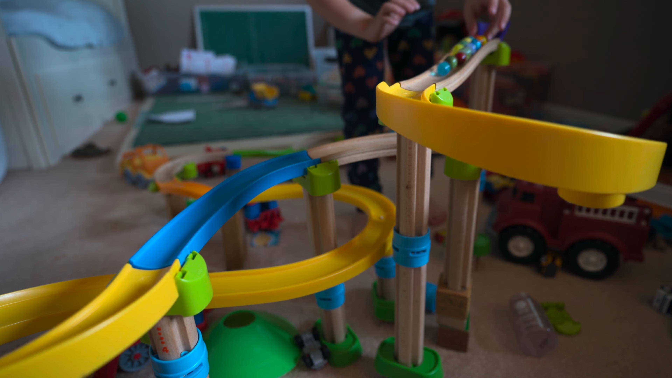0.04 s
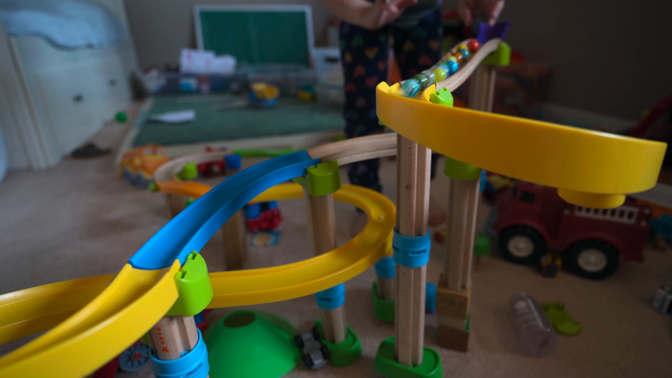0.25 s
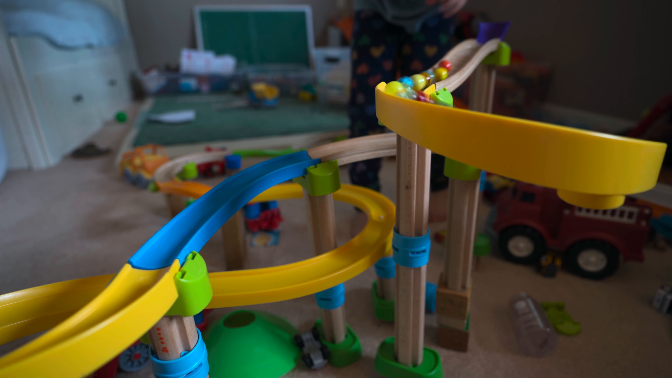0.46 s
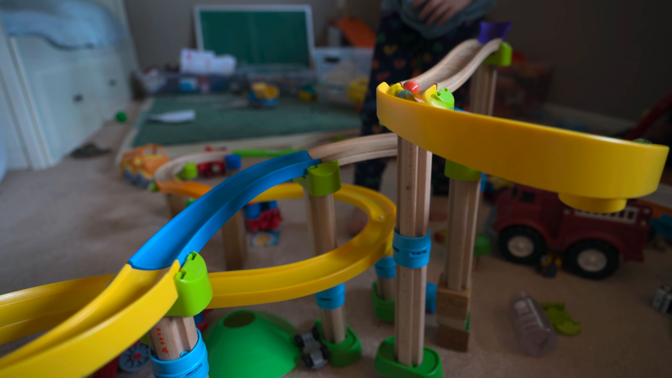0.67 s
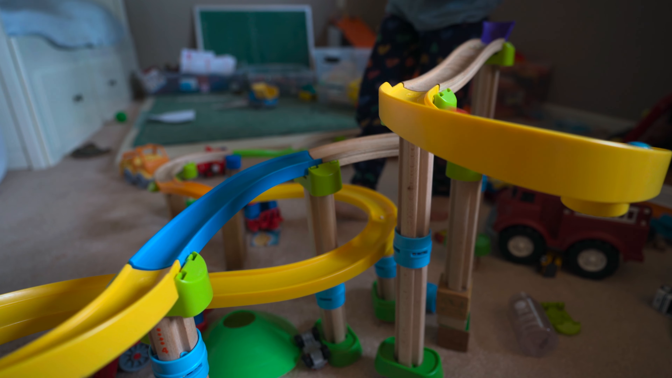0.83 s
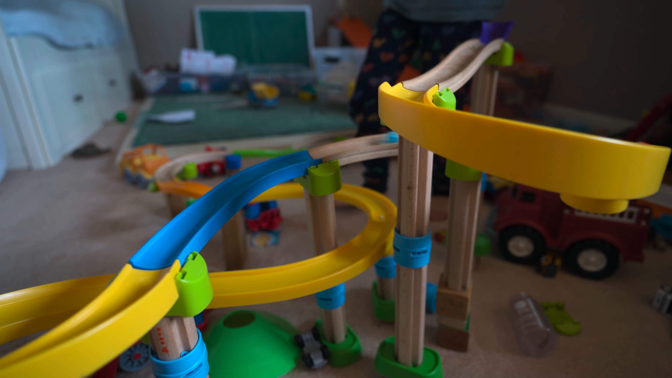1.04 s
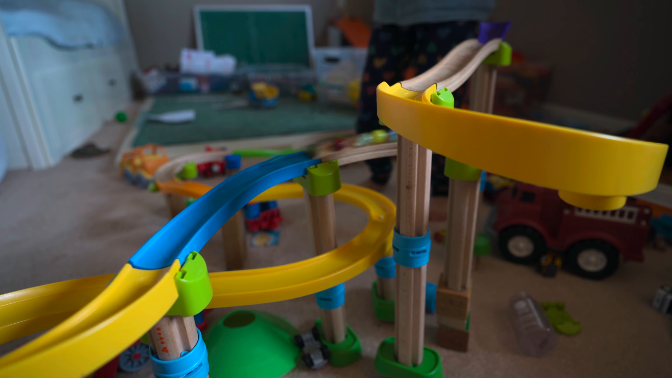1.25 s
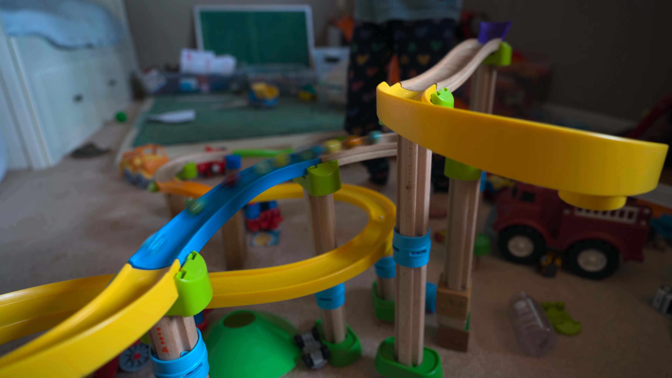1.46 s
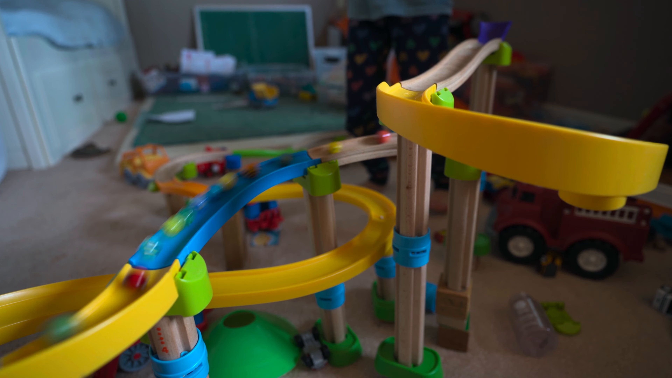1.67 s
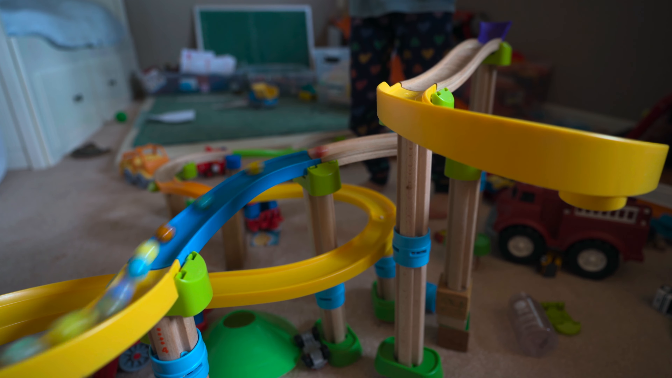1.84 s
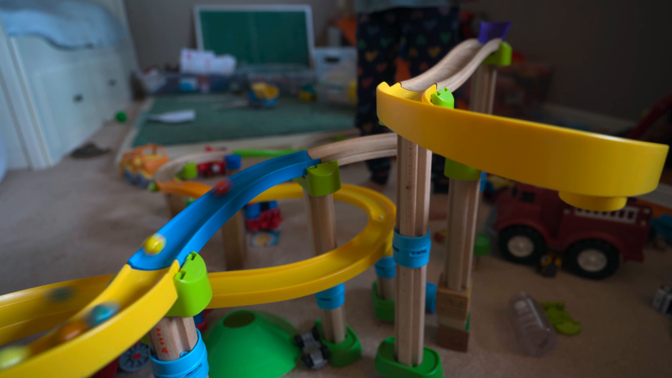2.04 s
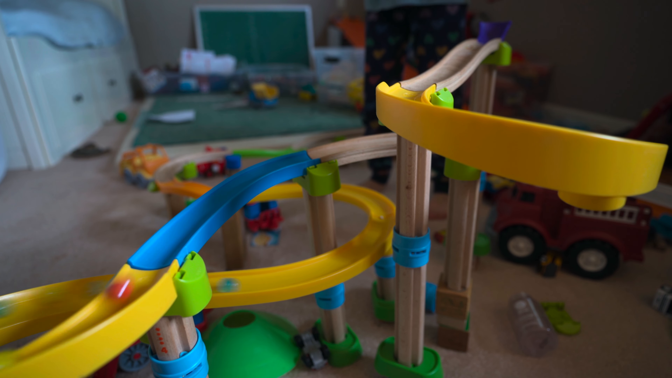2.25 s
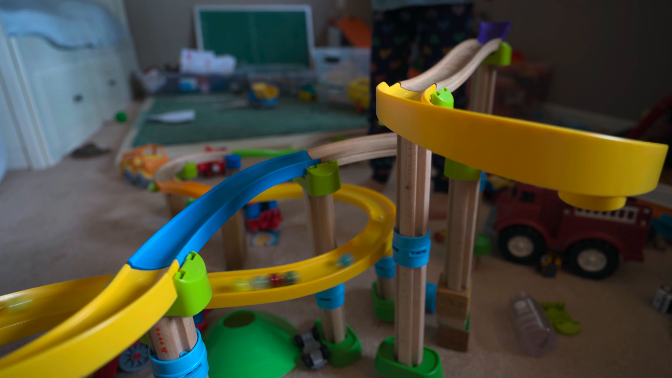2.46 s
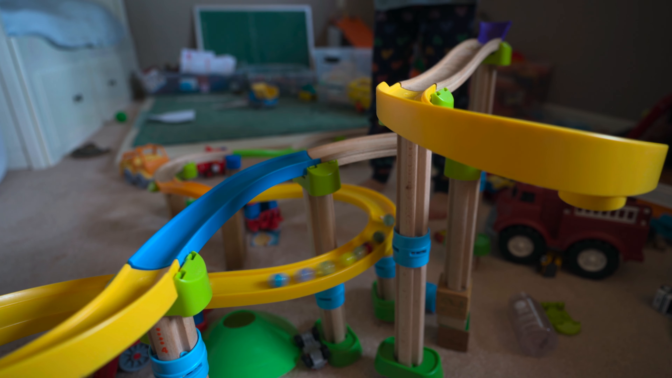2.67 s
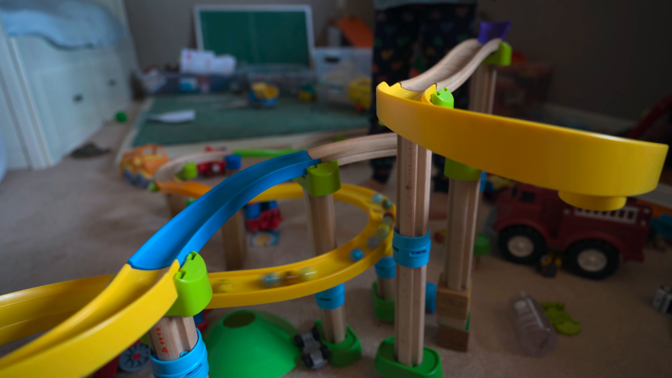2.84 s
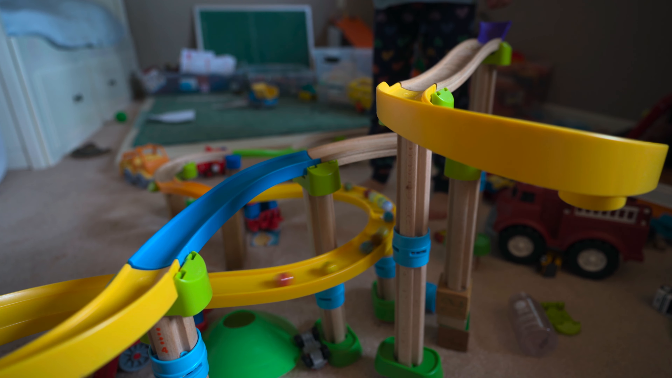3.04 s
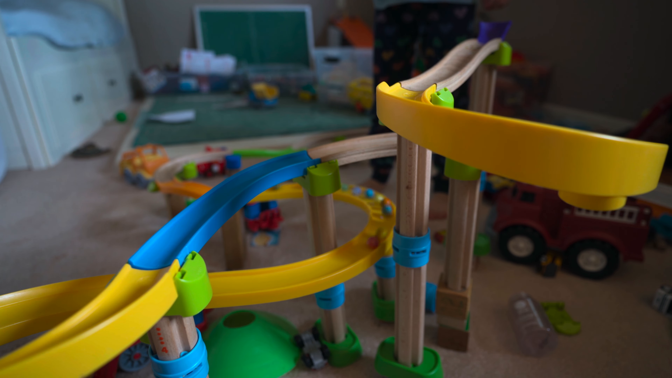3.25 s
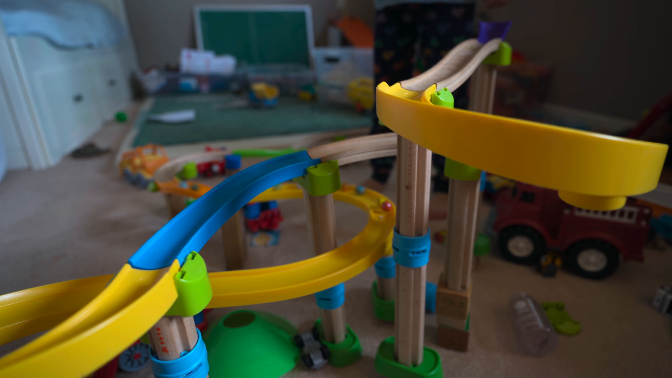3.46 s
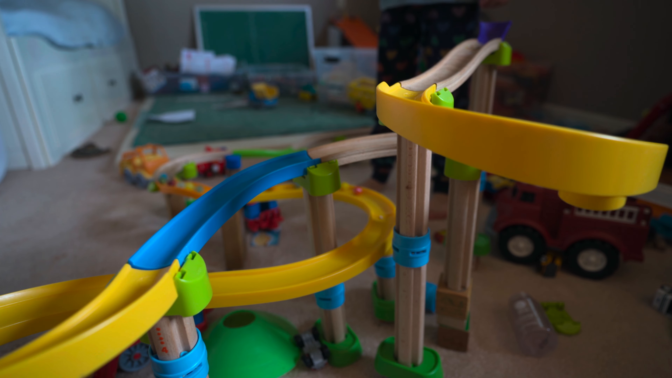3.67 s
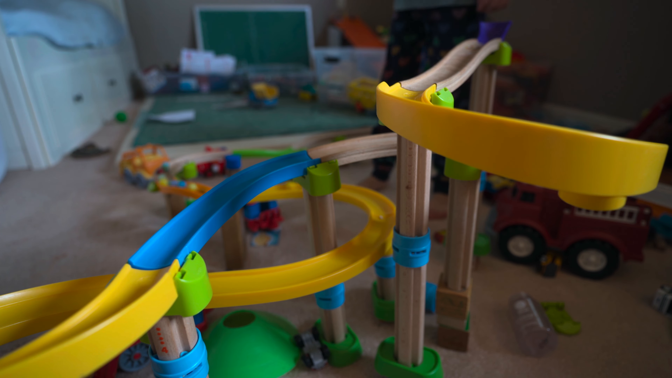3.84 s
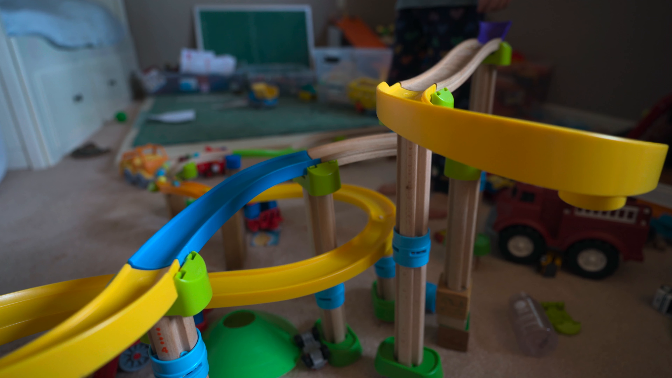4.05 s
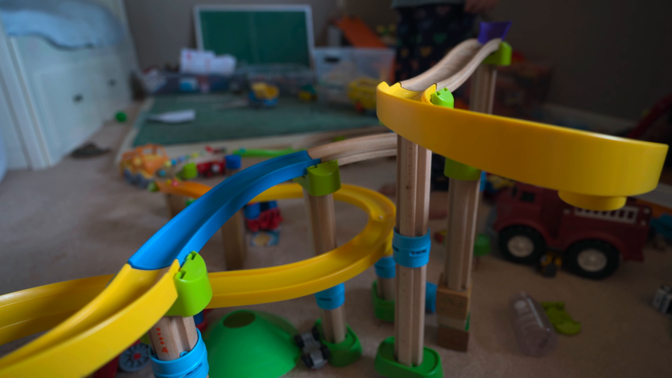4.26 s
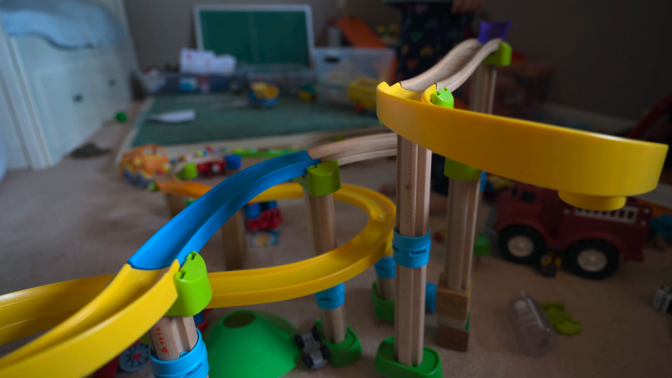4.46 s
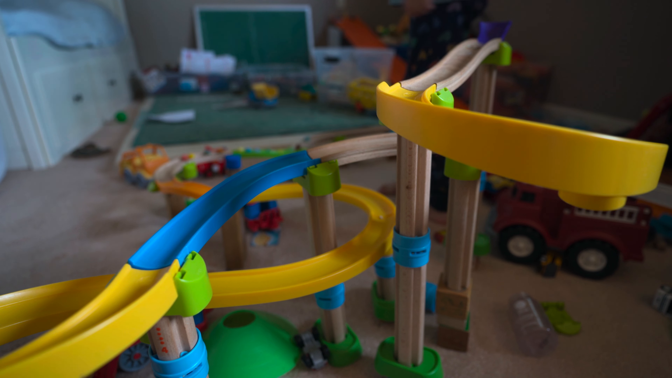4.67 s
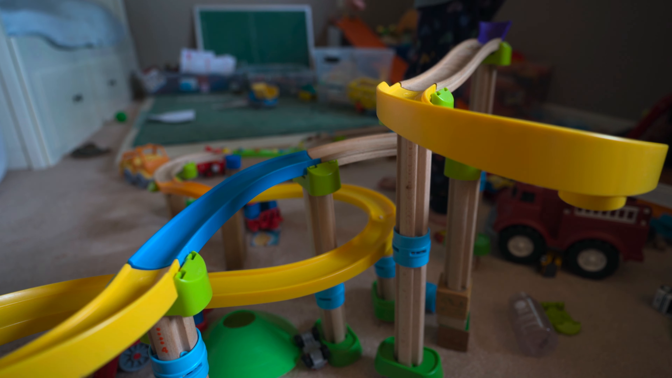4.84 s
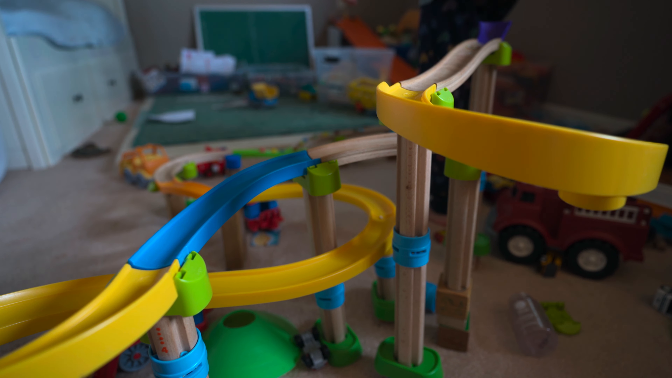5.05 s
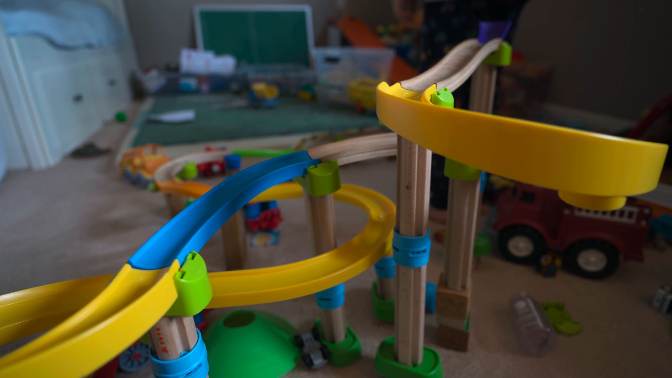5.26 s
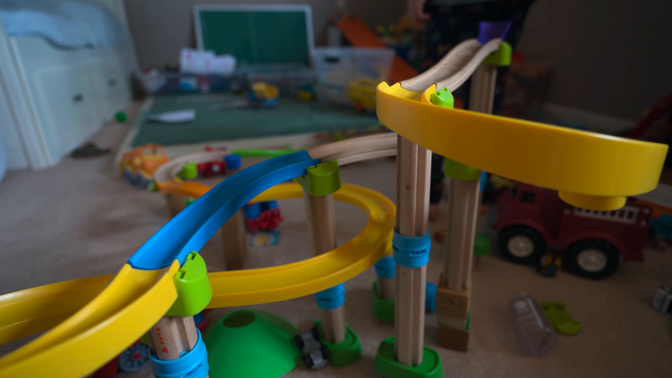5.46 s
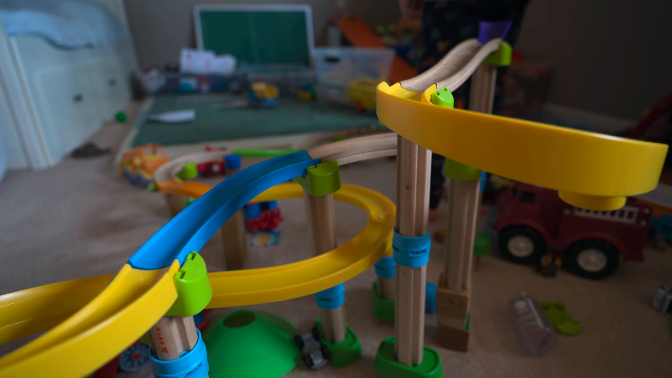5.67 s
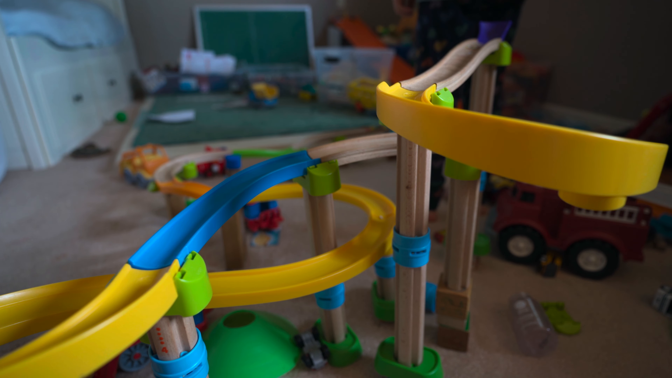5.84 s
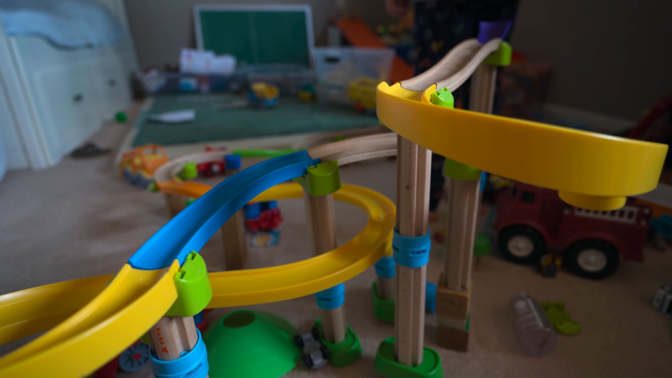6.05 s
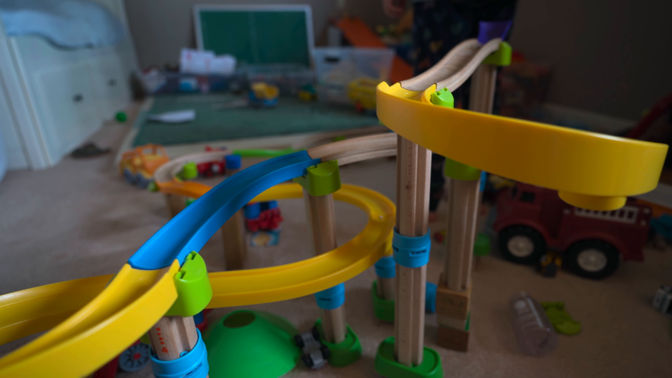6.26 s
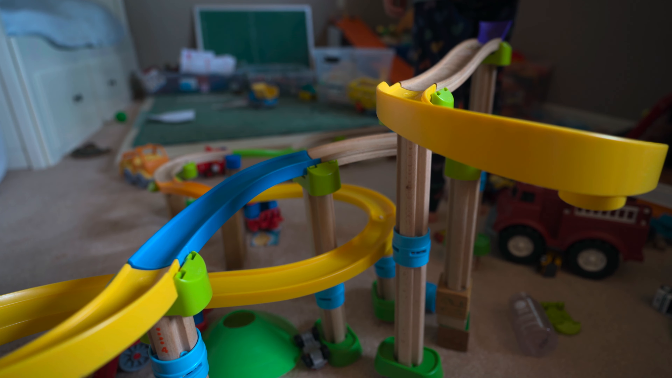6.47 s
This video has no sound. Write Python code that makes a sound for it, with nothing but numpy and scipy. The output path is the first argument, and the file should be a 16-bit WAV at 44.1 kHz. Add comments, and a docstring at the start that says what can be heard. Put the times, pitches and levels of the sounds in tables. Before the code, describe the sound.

Marbles roll and clack rapidly along a toy run in a carpeted room, loudest near two seconds, ending with small hollow plinks in a cup.

```python
"""Carpeted room: glass marbles roll down a toy run of wooden rails and plastic curves into a plastic cup.
Noise shaped by random tiny contacts drives the resonances of each piece of track in turn.
Marbles clack on joints and each other as decaying bursts and short notes, pass close to the microphone
and fade along a far rail. In the cup: clicks, decaying sine modes, circling hum, ticks and a skid.
A soft thump, decaying-noise echoes and a steady room tone lie behind."""
import sys
import numpy as np
from scipy import signal
from scipy.fft import rfft, irfft, next_fast_len
from scipy.io import wavfile
from scipy.ndimage import uniform_filter1d

SR = 44100
rng = np.random.default_rng(int(sys.argv[2]) if len(sys.argv) > 2 else 0)


def pcm_store(signal):
    """Save signal as 16-bit PCM."""
    levels = np.round(np.clip(np.atleast_2d(signal), -1, 1) * 32767)
    wavfile.write(sys.argv[1], SR, levels.astype(np.int16).T)


N = 287091

# ring spectrum of the start ramp: freq_hz [Hz], density_db [dB per Hz, relative]
START_RAMP = [(410, -51), (700, -17), (788, -33), (852, -21.5), (1500, -15), (1690, -2.5), (1890, -12),
              (2190, -14), (2590, -16), (2920, -2.5), (3370, -20.5), (4490, -12.5), (5840, -20),
              (10300, -25.5), (16000, -59)]
# ring spectrum of the upper curve: freq_hz [Hz], density_db [dB per Hz, relative]
UPPER_CURVE = [(410, -45), (700, -21), (1210, -19.5), (1330, -21.5), (1440, -15), (1920, -11), (2300, 0),
               (2630, -10.5), (3370, -13.5), (3690, -10), (4380, -21), (4730, -18), (6650, -23),
               (9730, -20.5), (16000, -41)]
# ring spectrum of the wooden rail: freq_hz [Hz], density_db [dB per Hz, relative]
WOOD_RAIL = [(410, -49), (700, -23), (765, -12), (986, -13.5), (1080, -6.5), (1580, -7), (2010, 7),
             (2360, 1.5), (2580, -4), (3090, 0.5), (4080, -14), (4400, -10), (5890, -18.5), (9190, -21.5),
             (14500, -36)]
# ring spectrum of the curve nearest the microphone: freq_hz [Hz], density_db [dB per Hz, relative]
NEAR_CURVE = [(410, -50.5), (700, -15.5), (863, -11.5), (1360, -9.5), (1770, 1), (2130, 4.5), (3320, -12),
              (3840, -11.5), (4320, -18), (5260, -13), (6740, -20.5), (8530, -19.5), (9480, -24),
              (12500, -29.5), (16000, -43)]
# ring spectrum of the lower curve: freq_hz [Hz], density_db [dB per Hz, relative]
LOWER_CURVE = [(410, -61.5), (700, -29.5), (998, -12.5), (1130, -16.5), (1240, -10.5), (1660, -7),
               (2080, -11.5), (2460, -8), (3090, -15), (3930, -11.5), (4460, -11), (5200, -11.5),
               (6400, -16), (8620, -15.5), (10000, -20), (11800, -19), (14500, -27)]
# ring spectrum of the back curve: freq_hz [Hz], density_db [dB per Hz, relative]
BACK_CURVE = [(410, -32), (700, -20), (1100, -5), (1680, -3.5), (2300, -0.5), (2700, -3.5), (3050, 1),
              (4000, -10), (6000, -17.5), (8500, -16.5), (10000, -18), (12000, -18), (14500, -26)]
# ring spectrum of the far rail: freq_hz [Hz], density_db [dB per Hz, relative]
FAR_RAIL = [(410, -48), (700, -8.5), (1070, -13.5), (1170, 0.5), (1360, -24), (1730, -7), (2060, -4.5),
            (2270, -1), (2680, -7), (3030, -4), (3800, -7), (4530, -16), (5970, -20), (7500, -17),
            (11600, -21.5), (14000, -36)]
# pieces in running order: arrive_s [s], piece, boom_hz [Hz], boom_db [dB], ring_hz [Hz], ring_db [dB],
# grit_db, rumble_db [dB at ROLL_REF_DB], knock_rate [per s], lean_db [left minus right, dB]
ROUTE = [(0, START_RAMP, 463, 8.5, 2855, 5.1, -49, -48.5, 5, -6),
         (0.329, UPPER_CURVE, 453, 7.2, 2380, 2.9, -40, -49, 15.4, -6),
         (1.08, WOOD_RAIL, 387.5, 5.5, 2080, 0.9, -38.5, -41, 28, -4),
         (1.581, NEAR_CURVE, 485, 6.3, 1770, 1.6, -38.5, -42, 33, -3),
         (2.82, LOWER_CURVE, 524, 10, 1660, 7, -37.5, -40.5, 24, -4.5),
         (3.85, BACK_CURVE, 227, 12, 1650, 2.4, -34, -38.5, 25, -1),
         (4.421, FAR_RAIL, 544, 3.2, 1770, 8.4, -33.5, -48, 7.7, -2)]
# narrow resonances of the pieces: piece, freq_hz [Hz], width_hz [Hz], height_db [dB]
SHELL = [(START_RAMP, 2160, 90, 3.6), (START_RAMP, 2420, 150, 5.5), (UPPER_CURVE, 2120, 70, 2.7),
         (UPPER_CURVE, 3010, 100, 7.9), (UPPER_CURVE, 4830, 140, 3.7), (WOOD_RAIL, 2260, 130, -4),
         (WOOD_RAIL, 2500, 99, 3.6), (WOOD_RAIL, 3760, 140, 4.3), (NEAR_CURVE, 2930, 150, 2.6),
         (NEAR_CURVE, 3880, 140, 3.2), (NEAR_CURVE, 4500, 180, 2.4), (NEAR_CURVE, 5400, 110, 3.04),
         (NEAR_CURVE, 8350, 140, 6.2), (LOWER_CURVE, 1410, 100, 3), (LOWER_CURVE, 2270, 100, 3.4),
         (LOWER_CURVE, 2450, 130, 3), (LOWER_CURVE, 3700, 98, 6.2), (LOWER_CURVE, 7180, 340, 6.2),
         (LOWER_CURVE, 1690, 62, 2.2), (BACK_CURVE, 8600, 440, 3.7), (FAR_RAIL, 1760, 56, 1.8),
         (FAR_RAIL, 2940, 150, 5.1), (FAR_RAIL, 5970, 380, 7.6), (FAR_RAIL, 12000, 410, 4)]
# posts and floor: freq_hz [Hz], density_db [dB per Hz, relative]
TOWER = [(25, -23), (50, -12), (90, 2.5), (160, -2.5), (250, -2.5), (400, -1.5), (580, -5), (720, -9),
         (1000, -18.5), (1600, -60)]
# glass meeting glass: freq_hz [Hz], density_db [dB per Hz, relative]
GLASS = [(5000, -48), (8000, -8), (10000, 5), (12500, 8), (16000, -1)]
# port difference for the farther pieces, beside the lean: freq_hz [Hz], difference_db [left minus right, dB]
PORTS_FAR = [(130, 5), (500, -2.5), (1200, -1.5), (2200, -3.5), (3500, -4.5), (5000, 4.5), (7000, 5.5),
             (10000, 2.5), (15000, -1.5)]
# port difference for the near and lower curves, beside the lean: freq_hz [Hz], difference_db [dB]
PORTS_NEAR = [(1200, 0), (1800, 2), (2800, -3.5), (3500, -5), (3900, 7), (4400, 4), (5300, 10.5), (6800, 9),
              (8400, 0.5), (11000, 3.5)]


def track(split_hz, ring_width_hz, boom_width_ratio, bass_hz, glass_db):
    """Contact forces drive whichever piece the batch is on, and the tower under it."""
    share = shares(handover_s=0.0328, stringing_ratio=0.13)
    *drive, glass = forces(share, ring_db=-6.0, chatter_db=-5.5, push_db=6.0, clack_ring_db=-5.0,
                           click_db=-3.0, thud_db=-24.5, last_s=5.46, leave_db=-4.0)
    hz = np.fft.rfftfreq(4096, 1 / SR)
    low = 1 / (1 + (hz / split_hz) ** 12)
    out = amp(glass_db) * filtered(glass, coloured(GLASS))
    walls = wall_rings(clack_db=-1.5, rattle_db=0, rattle_scatter_db=3, detune=0.084, t60_s=0.028, count=800)
    out += walls * spread(np.array([-2.5]))
    for row, on_piece in zip(ROUTE, share):
        _, piece, boom_hz, boom_db, ring_hz, ring_db, *_ = row
        closest = piece == NEAR_CURVE
        on = np.flatnonzero(on_piece)
        # the narrow track radiates deep bass only over a short distance
        bass = 1 if closest or piece == WOOD_RAIL else hz ** 2 / np.hypot(hz ** 2, bass_hz ** 2)
        boom = boom_db * bump(hz, boom_hz, boom_width_ratio * boom_hz)
        rumble = unit(bass * amp(along(TOWER, hz) + boom))[None]
        shell_db = sum(db * bump(hz, f, width) for part, f, width, db in SHELL if part == piece)
        body = amp(along(piece, hz) + shell_db + ring_db * bump(hz, ring_hz, ring_width_hz))
        near = closest or piece == LOWER_CURVE
        sides = spread(along(PORTS_NEAR if near else PORTS_FAR, hz))
        ring = unit(body * np.sqrt(low)) * sides
        click = unit(body * np.sqrt(1 - low)) * sides
        for force, colour in zip(drive, (rumble, ring, click)):
            impulse = irfft(causal(colour))
            add(out, on[0] / SR, signal.fftconvolve(force[:, on] * on_piece[on], impulse, axes=1))
    return out * spread(on_route([row[-1] for row in ROUTE], share))


def shares(handover_s, stringing_ratio):
    """Batch share on each piece, as amplitude; the batch strings out, so handovers lengthen."""
    t = np.arange(N) / SR
    arrived = [np.clip((t - s) / (handover_s + stringing_ratio * s) + .5, 0, 1) for s, *_ in ROUTE[1:]]
    return np.sqrt(np.abs(np.diff([np.ones(N), *arrived, np.zeros(N)], axis=0)))


def on_route(values, share):
    """Per-piece columns, blended as the batch moves from piece to piece."""
    return np.transpose(values) @ share ** 2


# rolling level, reference for its layers: time_s [s], level_db [dB]
ROLL = [(0.0, -39), (0.2, -35.5), (0.47, -26), (0.68, -24.5), (0.72, -30), (0.77, -26.5), (0.92, -24.5),
        (1.0, -28.5), (1.16, -29), (1.53, -28), (1.88, -23.5), (2.15, -21.5), (2.66, -27), (2.84, -32),
        (3.05, -31.5), (3.69, -38), (4.31, -49.5), (4.62, -46.5), (5.05, -44.5), (5.43, -51.5),
        (5.55, -53.5), (5.83, -56.5), (6.0, -50)]
ROLL_REF_DB = -30
# dB per dB of rolling above the reference: grit grows faster than rumble
GRIT_LAW, RUMBLE_LAW = 1.12, 0.81


def forces(share, ring_db, chatter_db, push_db, clack_ring_db, click_db, thud_db, last_s, leave_db):
    """Rolling contacts plus blows, as felt by the track's rumble, ring and click and by the glass."""
    roll, = curves(ROLL)
    piece_grit, piece_rumble, knock_rate = on_route([row[-4:-1] for row in ROUTE], share)
    # as the last marbles leave the last rail, rumble stops and grit drops
    on_rails = np.clip((last_s - np.arange(N) / SR) / 0.25, 0, 1)
    grit = piece_grit + GRIT_LAW * (roll - ROLL_REF_DB) + leave_db * (1 - on_rails)
    rumble = piece_rumble + RUMBLE_LAW * (roll - ROLL_REF_DB)
    rolling = contacts(rate_per_s=980, scatter_db=4.0, life_s=0.0084)
    gritty = contacts(rate_per_s=400, scatter_db=-0.5, life_s=0.0026)
    lumps = contacts(rate_per_s=450, scatter_db=3.0, life_s=0.008)
    pushes, clicks, knocks, glass = clacks(
        roll, grit, knock_rate, t60_click_s=0.018, t60_ring_s=0.029, t60_glass_s=.013,
        rise_s=.0009, rebound_s=0.0044, rebound_db=-5.0, count=300)
    # powers of independent parts add
    deep_power = (amp(rumble) * lumps * on_rails) ** 2 + knocks * amp(thud_db) ** 2
    soft_power = (amp(roll + ring_db) * rolling) ** 2 + knocks * amp(clack_ring_db) ** 2
    hard_power = amp(grit) ** 2 * rolling * gritty + clicks * amp(click_db) ** 2
    deep = ports() * np.sqrt(deep_power)
    glass = ports() * np.sqrt(glass)
    soft = wandering(ports(), depth_db=3.0) * np.sqrt(soft_power)
    hard = wandering(ports(), depth_db=1.9) * np.sqrt(hard_power)
    chatter = amp(roll + chatter_db) * taps(rate_per_s=420, scatter_db=1.0)
    return deep, soft + chatter + pushes * amp(push_db), hard, glass


def contacts(rate_per_s, scatter_db, life_s):
    """Force envelope of rms 1: many tiny contacts of unequal size, each decaying."""
    sizes = amp(scatter_db * np.clip(rng.standard_normal(N), -2, 2))
    hits = (rng.random(N) < rate_per_s / SR) * sizes ** 2
    return unit(np.sqrt(signal.lfilter([1], [1, -np.exp(-1 / (life_s * SR))], hits)))


def taps(rate_per_s, scatter_db):
    """Single tiny blows of rms 1: marbles chattering over the grain of the track."""
    hit = rng.random(N) < rate_per_s / SR
    sizes = amp(scatter_db * np.clip(rng.standard_normal(N), -2, 1.5))
    return unit(hit * rng.choice([-1, 1], N) * sizes)


def wandering(x, depth_db):
    """Marbles moving along a piece favour now some of its modes, now others: smooth random gains."""
    z = signal.stft(x, nperseg=1024)[2]
    field = uniform_filter1d(rng.standard_normal(z.shape[1:]), size=3, axis=0)
    field = uniform_filter1d(field, size=7, axis=1)
    gain = unit(amp(depth_db * np.clip(unit(field), -2, 2)))
    return signal.istft(z * gain, nperseg=1024)[1][:, :N]


# single knocks, hard and soft, on joints and on each other: time_s [s], click_db [dB, relative],
# ring_db [dB re click], glass_db [dB re click]
CLACKS = [(0.144, -42, 14, -25), (0.252, -43, 5, -25), (0.325, -35.5, 8, -14), (0.375, -32, 12, -22),
          (0.4006, -27, 10.5, -15), (0.441, -27, 5, -18), (0.4613, -19, 4, -7), (0.479, -23, 5, -14),
          (0.538, -26, 9, -18), (0.551, -32, 3, -18), (0.594, -32, 9, -20), (0.6485, -27, 10, -18),
          (0.663, -16.5, 2.5, -20), (0.670, -17.5, 3.5, -23), (0.676, -26, 7, -20), (0.694, -29, 10.5, -22),
          (0.725, -15.5, 2.5, -10), (0.7318, -16.5, 2.5, -8), (0.761, -28, 8, -20), (0.78, -21.5, 6.5, -18),
          (0.808, -22, 2, -12), (0.827, -30, 5, -13), (0.8386, -29.5, 12.5, -18), (0.872, -23, 5, -16),
          (0.8848, -16, -17, -20), (0.897, -24.5, 9, -25), (0.933, -23, 7, -22), (0.948, -22, 5.5, -25),
          (0.967, -24, 3, -14), (1.038, -25.5, 8, -22), (1.0668, -24, 6, -20), (1.1324, -26, 10, -25),
          (1.148, -28.5, 7.5, -20), (1.1943, -24, 6.5, -20), (1.213, -21.5, 6.5, -18), (1.254, -24, 4, -22),
          (1.2765, -25, 7.5, -20), (1.290, -25, 4, -8), (1.308, -23, 5.5, -20), (1.348, -23.5, 5.5, -22),
          (1.3759, -23.5, 7, -20), (1.4188, -21.5, 4, -16), (1.436, -33, 8, -22), (1.4612, -23.5, 6, -18),
          (1.5041, -24.5, 8.5, -20), (1.546, -35, 15, -22), (1.562, -21.5, 4.5, -18),
          (1.5934, -24.5, 7, -20), (1.6304, -13.5, 0, -9), (1.6622, -14.5, 1.5, -22), (1.716, -10, -2, -12),
          (1.7417, -15.5, 3, -2), (1.7493, -18, 2, -10), (1.764, -10.5, -1.5, -4.5), (1.7792, -8, 2.5, -20),
          (1.7885, -19, 3, -12), (1.8388, -9, -5, -10), (1.845, -13.5, 3.5, -5), (1.8757, -9.5, 2.5, -18),
          (1.891, -23, 0, -16), (1.9199, -11, 2, -22), (1.9493, -15, -0.5, -13), (1.9655, -16, 1.5, -12),
          (1.9749, -8.5, -5.5, -11), (1.99, -15, -10, -7), (2.011, -15.5, 0.5, -22), (2.023, -24, 2, -22),
          (2.0384, -15, 2.5, -20), (2.0453, -11.5, 1, -16), (2.0717, -15, 1, -24), (2.0877, -14, 0, -22),
          (2.110, -10.5, 0, -23), (2.121, -10, -6, -26), (2.1466, -11.5, -0.5, -24), (2.154, -11, -5, -25),
          (2.17, -12.5, -3, -24), (2.2134, -11, -3, -20), (2.2236, -9.5, 0.5, -20), (2.234, -12, -5, -18),
          (2.247, -10.5, -2, -18), (2.2697, -9.5, -1.5, -20), (2.295, -19, 0, -22), (2.3304, -18, -12, -13),
          (2.3475, -9.5, 2, -27), (2.3683, -12, -6, -25), (2.410, -19, -3, -14), (2.415, -9.5, 1.5, -13),
          (2.4447, -16, 1.5, -20), (2.456, -19, 3, -22), (2.474, -19, 5.5, -22), (2.529, -16.5, 3, -21),
          (2.542, -18.5, -5, -20), (2.552, -15, -4, -20), (2.567, -14.5, 4.5, -18), (2.601, -12.5, -4, -12),
          (2.6225, -23, -6, -22), (2.641, -20.5, -4, -20), (2.6849, -14.5, 1.5, -25),
          (2.701, -22.5, 1, -22), (2.735, -31, 5, -22), (2.7555, -24.5, 5, -22), (2.783, -18.5, 0, -19),
          (2.827, -26, 3, -21), (2.8414, -21, 1.5, -22), (2.9267, -35, 14, -22), (2.9723, -35, 9, -28),
          (2.999, -27, 2, -20), (3.0393, -36, 9, -25), (3.049, -37, 9, -22), (3.068, -26.5, 5.5, -18),
          (3.1239, -25, 2, -25.5), (3.199, -30.5, 3, -20), (3.214, -37, 4, -22), (3.227, -31, 4, -20),
          (3.271, -31, 5, -22), (3.29, -28, 1, -22), (3.3207, -26, 1, -22), (3.348, -31.5, 5, -20),
          (3.363, -30, -2, -14), (3.3736, -27.5, 1, -14), (3.427, -31, 1, -18), (3.4619, -32, 3.5, -18),
          (3.4984, -30, 5, -18), (3.5247, -27, 2.5, -12), (3.5462, -25.5, 3.5, -18), (3.564, -29, 0, -16),
          (3.654, -42, 3, -12), (3.753, -33, -3, -14), (3.768, -34, -1, -12), (3.802, -35, -2, -14),
          (3.829, -32.5, -4, -14), (3.878, -40, 0, -16), (3.89, -41, -4, -16), (3.9178, -35, -7, -12),
          (3.964, -37, 5, -16), (3.9818, -37, 0, -10), (4.035, -37, 1, -14), (4.0972, -35, -2, -10),
          (4.118, -32.5, -4, -15), (4.1485, -30.5, -2, -17), (4.2034, -37.5, 0, -16), (4.251, -41.5, -2, 0)]
# random knocks: click and glass re grit, ring re rolling; size range multiplier
JOSTLE_CLICK_DB, JOSTLE_RING_DB, JOSTLE_GLASS_DB, JOSTLE_SIZE_DB = -0.5, 1.5, -0.5, 2


def clacks(roll_db, grit_db, rate_per_s, t60_click_s, t60_ring_s, t60_glass_s, rise_s,
           rebound_s, rebound_db, count):
    """First push of each blow, and decaying click, ring and glass powers; each rebounds in milliseconds."""
    # random knocks: marbles follow at uneven gaps, louder with the rolling
    passed = np.cumsum(rate_per_s) / SR
    turns = np.arange(count) + rng.random(count)
    sizes = rng.uniform(-1.1, 1, count)
    events = [(s, db + np.array([0, ring_db, glass_db])) for s, db, ring_db, glass_db in CLACKS]
    for i, size in zip(np.searchsorted(passed, turns[turns < passed[-1]]), sizes):
        levels = [grit_db[i] + JOSTLE_CLICK_DB, roll_db[i] + JOSTLE_RING_DB, grit_db[i] + JOSTLE_GLASS_DB]
        events.append((i / SR, np.array(levels) + JOSTLE_SIZE_DB * size))
    blows, rebounds = np.zeros((2, 3, N))
    for (s, levels), chance in zip(events, rng.random(len(events))):
        add(blows, s, amp(levels)[:, None])
        add(rebounds, s + rebound_s * (.5 + chance), amp(levels + rebound_db)[:, None])
    fades = amp(-60 / (SR * np.array([t60_click_s, t60_ring_s, t60_glass_s]))) ** 2
    # a blow takes a moment to spread through the piece
    lag = np.exp(-1 / (rise_s * SR))
    powers = signal.lfilter([1 - lag], [1, -lag], blows ** 2 + rebounds ** 2)
    decaying = [signal.lfilter([1], [1, -fade], power) for fade, power in zip(fades, powers)]
    return blows[1], *decaying


# centre of the struck wall's pitch, lower on later pieces: time_s [s], pitch_hz [Hz]
WALL_PITCH = [(0.9, 2294), (1.5, 2132), (2.55, 2072), (3.1, 1730)]


def wall_rings(clack_db, rattle_db, rattle_scatter_db, detune, t60_s, count):
    """Clacks and small rattles ring the wall where they land: short sines, randomly detuned."""
    roll, = curves(ROLL)
    pitch, = curves(WALL_PITCH)
    t, out = np.arange(SR // 12) / SR, np.zeros(N)
    blows = [(s, db + ring_db + clack_db) for s, db, ring_db, _ in CLACKS]
    for i, size in zip(rng.integers(0, N, count), rng.uniform(-0.95, 1, count)):
        blows.append((i / SR, roll[i] + rattle_db + rattle_scatter_db * size))
    decay = amp(-60 * t / t60_s) * (1 - np.exp(-t / 0.00095))
    for (s, db), spot in zip(blows, rng.uniform(-1.005, 1, len(blows))):
        hz = pitch[int(s * SR)] * np.exp(detune * spot)
        add(out, s, amp(db) * decay * np.sin(2 * np.pi * hz * t))
    return out


# landings and bounces in the cup: time_s [s], click_db [dB, relative],
# knock_db [dB re click], hum_db [dB re click]
DROPS = [(5.5706, -26.5, -5, -15), (5.647, -28, -2, -6), (5.6894, -34, -2, -11), (5.8864, -27, -5.5, -6),
         (5.9314, -31, -4, 3), (5.979, -35, -8, -8), (6.0262, -25.5, -6, 0), (6.0674, -32.5, -2.5, 0),
         (6.13, -26, -9.5, 1.5), (6.222, -39, -1, 24), (6.2417, -29, -3, 7), (6.249, -32, -8, 0),
         (6.2854, -28, -11, -7), (6.299, -36, -19, -5), (6.3589, -34.5, -13, -5), (6.3895, -35, -4.5, -5),
         (6.4058, -31, -7, -10), (6.4857, -27, -7.5, -8)]
# cup modes: freq_hz [Hz], level_db [dB, relative], t60_s [s]
CUP = [(630, -9, 0.19), (680, 2.5, 0.01), (760, -20, 0.069), (864, -8.5, 0.12), (855, 4, 0.013),
       (1035, -15, 0.083), (1370, -0.5, 0.0059), (1910, -1, 0.0089), (2150, -28, 0.07)]
# cup click spectrum: freq_hz [Hz], density_db [dB per Hz, relative]
CUP_CLICK = [(450, -49), (620, -19), (1000, 9.5), (1400, -2.5), (1950, 7.5), (2400, 2.5), (3200, -2),
             (5000, -3.5), (7000, 2.5), (12000, 4.5), (16000, -17)]
# circling after a landing: level envelope, relative
SWIRL_DB, SWIRL_RISE_S, SWIRL_HOLD_S, SWIRL_FADE_DB_PER_S = -24, 0.008, 0.074, 172


def cup(click_db, knock_db, hum_db, t60_click_s, cut_hz, lean_db):
    """A landing is a glassy click and a hollow modal knock; the circling marble keeps the cup ringing."""
    t = np.arange(SR // 2) / SR
    fade_db = SWIRL_FADE_DB_PER_S * np.maximum(t - SWIRL_HOLD_S, 0)
    circling = np.clip(t / SWIRL_RISE_S, 0, 1) * amp(SWIRL_DB - fade_db)
    knocks, force, swirl, hum = np.zeros((4, N))
    for s, db, hollow_db, linger_db in DROPS:
        ring = np.zeros(len(t))
        for (hz, level, t60), size in zip(CUP, rng.standard_normal(len(CUP))):
            ring += amp(level + size - 60 * t / t60) * np.sin(2 * np.pi * hz * t)
        add(knocks, s, amp(db + hollow_db + knock_db) * ring)
        add(force, s, amp(db + click_db - 60 * t / t60_click_s))
        add(swirl, s, (amp(db) * circling) ** 2)
        add(hum, s, (amp(db + linger_db) * circling) ** 2)
    force += np.sqrt(swirl) * contacts(rate_per_s=500, scatter_db=2.5, life_s=.002)
    clicks = filtered(ports() * force, coloured(CUP_CLICK))
    knocks += amp(hum_db) * np.sqrt(hum) * humming(waver_rad_per_root_s=10.96)
    # so small a cup radiates no bass
    highpass = signal.butter(14, cut_hz, "highpass", fs=SR, output="sos")
    knocks = signal.sosfilt(highpass, knocks)
    return clicks, knocks * spread(np.array([lean_db]))


def humming(waver_rad_per_root_s):
    """Cup modes sustained by a circling marble, weighted to the long-lived, phases drifting; rms 1."""
    t = np.arange(N) / SR
    steps = rng.standard_normal((len(CUP), N))
    drift = np.cumsum(steps, axis=1) * waver_rad_per_root_s / np.sqrt(SR)
    out = np.zeros(N)
    for (hz, db, t60), phase in zip(CUP, drift):
        out += amp(db) * t60 ** 2 * np.sin(2 * np.pi * hz * t + phase)
    return unit(out)


def landing_ticks(db, t60_s, edge_hz):
    """A falling marble strikes those already in the cup: a very short, bright noise tick."""
    force, t = np.zeros(N), np.arange(SR // 10) / SR
    for s, click_db, *_ in DROPS:
        add(force, s, amp(click_db + db - 60 * t / t60_s))
    bright = 1 / (1 + (edge_hz / (grid() + 1)) ** 4)
    return filtered(ports() * force, causal(unit(bright)))


def skid(db, start_s, length_s, centre_hz, width_hz):
    """One marble skids briefly along the cup wall: grainy band noise under a half-sine swell."""
    swell = np.sin(np.pi * np.clip((np.arange(N) / SR - start_s) / length_s, 0, 1))
    grain = contacts(rate_per_s=400, scatter_db=2.5, life_s=.002)
    return amp(db) * swell * grain * unit(filtered(ports(), bump(grid(), centre_hz, width_hz)))


THUMP_S = 4.712
# dull thump spectrum: freq_hz [Hz], density_db [dB per Hz, relative]
THUMP = [(100, -16), (270, -3.5), (400, 1), (750, -7), (1200, -18), (2500, -40)]


def thump(db, t60_s, landing_db, landing_t60_s):
    """A soft, dull blow elsewhere in the room; cup landings thud faintly through the floor likewise."""
    force, t = np.zeros(N), np.arange(SR // 2) / SR
    add(force, THUMP_S, amp(db - 60 * t / t60_s))
    for s, click_db, hollow_db, _ in DROPS:
        add(force, s, amp(click_db + hollow_db + landing_db - 60 * t / landing_t60_s))
    return filtered(ports() * force, coloured(THUMP))


# reverberation: freq_hz [Hz], t60_s [s]
ROOM = [(150, 0.63), (700, 0.39), (2500, 0.53), (8000, 0.22), (15000, 0.087)]


def room(x, gap_s, count):
    """Furnished-room echo: decaying noise tails, treble mostly dying first, crossfaded as marbles move."""
    size = SR // 3
    # the close ports hear much the same reflections
    noise = ports()[:, :count * size].reshape(2, count, size).swapaxes(0, 1)
    hz, t, z = signal.stft(noise, SR, nperseg=256)
    tails = signal.istft(z * amp(-60 * t / along(ROOM, hz)[:, None]), SR, nperseg=256)[1]
    tails = tails * np.clip(np.arange(tails.shape[-1]) / (gap_s * SR) - .5, 0, 1)
    out, place = np.zeros((2, N)), np.linspace(0, count - 1, N)
    for k, tail in enumerate(tails):
        on = np.flatnonzero(np.abs(place - k) < 1)
        part = x[:, on] * np.cos(np.pi / 2 * (place[on] - k))
        add(out, on[0] / SR, signal.fftconvolve(part, tail / np.linalg.norm(tail[0]), axes=1))
    return out


# background spectrum: freq_hz [Hz], density_db [dB per Hz, relative]
ROOM_TONE = [(20, -10), (60, -9.5), (98, 4.5), (150, -7), (400, -8.5), (1500, -7), (6000, -22.5),
             (16000, -37)]


def room_tone(level_db):
    """Steady coloured noise of the room, at this overall rms."""
    return amp(level_db) * unit(filtered(ports(), amp(along(ROOM_TONE, grid()))))


# likeness of the two microphone ports: freq_hz [Hz], correlation [-1 to 1]
ALIKE = [(60, .2), (130, -.6), (300, -.1), (640, .5), (1400, .92), (2300, .76), (3300, .42), (7000, .2),
         (15000, .1)]


def ports():
    """White noise as the two ports share it: mid and side mixed to the given correlation."""
    turn = np.arccos(np.clip(along(ALIKE, grid()), -1, 1)) / 2
    mid, side = filtered(rng.standard_normal((2, N)), np.array([np.cos(turn), np.sin(turn)]))
    return np.array([mid + side, mid - side])


def spread(db):
    """Left and right gains for a level difference."""
    return amp(np.array([db, -db]) / 2)


def amp(db):
    """Decibels to gain."""
    return 10 ** (np.asarray(db) / 20)


def unit(x):
    """x at rms 1."""
    return x / np.sqrt(np.mean(x ** 2) + 1e-20)


def along(points, hz):
    """(Hz, value) points read on a log axis."""
    f, v = np.transpose(points)
    return np.interp(np.log(hz + 1), np.log(f + 1), v)


def curves(rows):
    """One value per sample for each column after the time."""
    s, *cols = np.transpose(rows)
    return [np.interp(np.arange(N) / SR, s, c) for c in cols]


def bump(hz, centre_hz, width_hz):
    """A resonance peak of height 1."""
    return 1 / (1 + (2 * (hz - centre_hz) / width_hz) ** 2)


def grid():
    """Filter frequencies in Hz, padded beyond the scene length."""
    return np.fft.rfftfreq(2 * next_fast_len(N // 2 + SR // 8, real=True), 1 / SR)


def filtered(x, response):
    """x times a frequency response."""
    m = 2 * (response.shape[-1] - 1)
    return irfft(rfft(x, m) * response, m)[..., :N]


def causal(gain):
    """Minimum-phase response with this gain: rings only after a blow."""
    c = irfft(np.log(np.maximum(gain, 1e-6)))
    half = c.shape[-1] // 2
    c[..., 1:half] *= 2
    c[..., half + 1:] = 0
    return np.exp(rfft(c))


def coloured(points):
    """Causal response of a (Hz, dB) spectrum at rms gain 1."""
    return causal(unit(amp(along(points, grid()))))


def add(mix, s, sound):
    """Mix a sound in at time s."""
    i = max(round(s * SR), 0)
    part = mix[..., i:i + sound.shape[-1]]
    part += sound[..., :part.shape[-1]]


def scene():
    """Close track fairly dry; far cup clicks about equally direct and through the room, knocks more direct."""
    run = track(split_hz=3980, ring_width_hz=61, boom_width_ratio=0.23, bass_hz=99, glass_db=-3.0)
    run += thump(db=-44.5, t60_s=0.12, landing_db=-23.5, landing_t60_s=0.3)
    clicks, knocks = cup(click_db=-6.0, knock_db=-1.0, hum_db=-4, t60_click_s=0.027, cut_hz=570, lean_db=-4)
    ticks = landing_ticks(db=-6.5, t60_s=.016, edge_hz=8700)
    scuff = skid(db=-48, start_s=6.355, length_s=0.05, centre_hz=4600, width_hz=3000)
    run_echo = amp(-12.5) * room(run, gap_s=0.0061, count=16)
    cup_echo = room(amp(-0.5) * clicks + amp(-8.5) * knocks, gap_s=0.008, count=16)
    return run + run_echo + clicks + knocks + ticks + scuff + cup_echo + room_tone(level_db=-51.5)


TOP_HZ = 16000


def record(dry):
    """Right port hears 25 microseconds later; the highest peaks round off; treble falls steeply above TOP_HZ."""
    hz = grid()
    delay_s = np.array([[0], [.000025]])
    heard = filtered(dry, np.exp(-2j * np.pi * hz * delay_s))
    rounded = heard / (1 + (np.abs(heard) / .75) ** 6) ** (1 / 6)
    return filtered(rounded, amp(-120 * np.clip((hz - TOP_HZ) / 1200, 0, 1)))


dry = scene()
out = record(dry)
pcm_store(out)
```